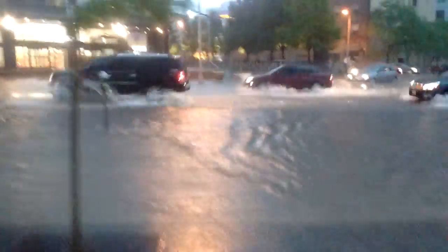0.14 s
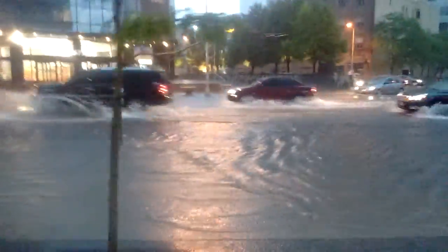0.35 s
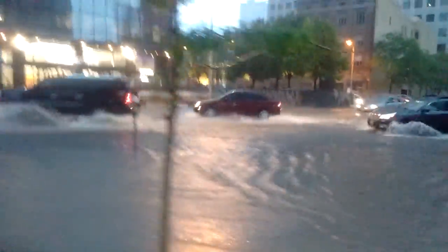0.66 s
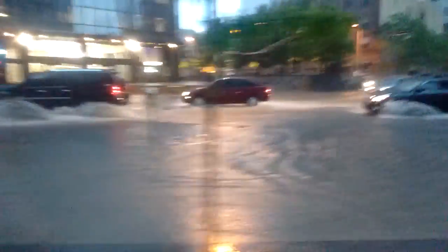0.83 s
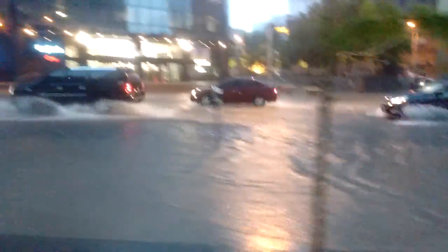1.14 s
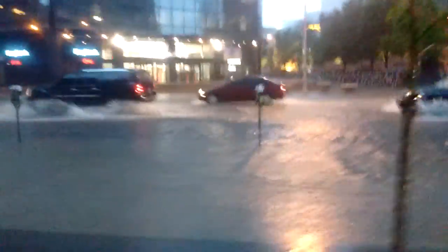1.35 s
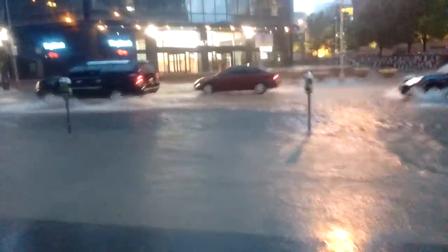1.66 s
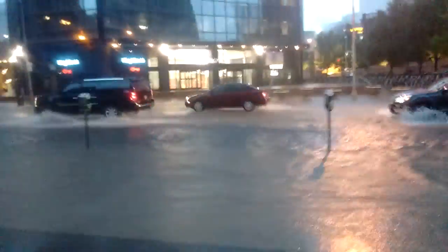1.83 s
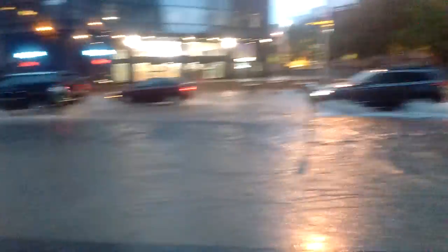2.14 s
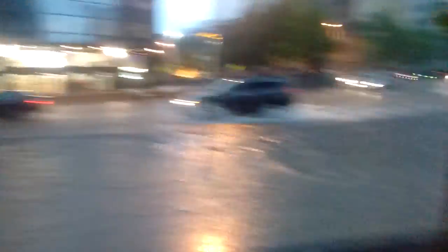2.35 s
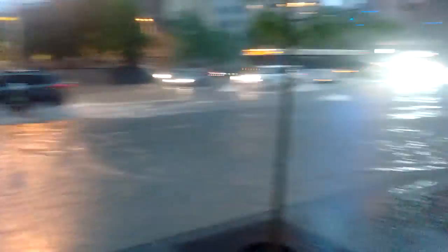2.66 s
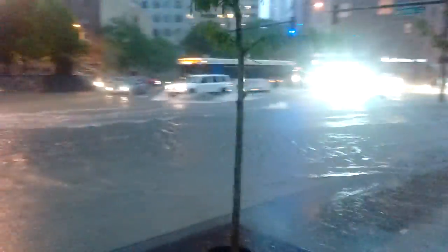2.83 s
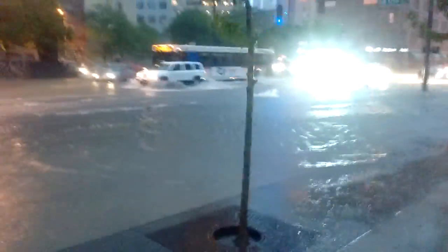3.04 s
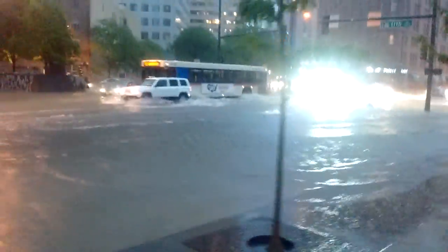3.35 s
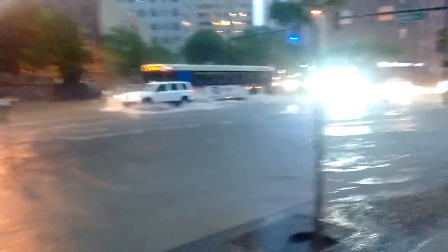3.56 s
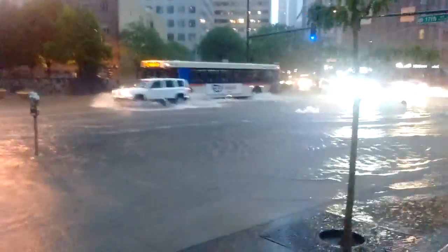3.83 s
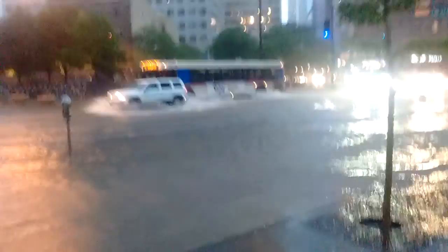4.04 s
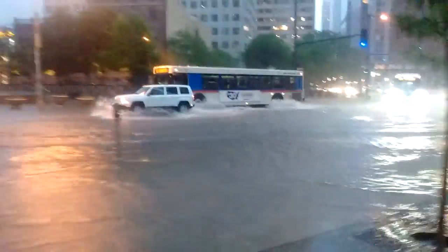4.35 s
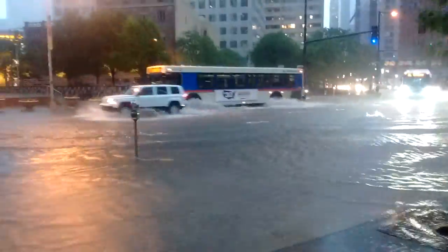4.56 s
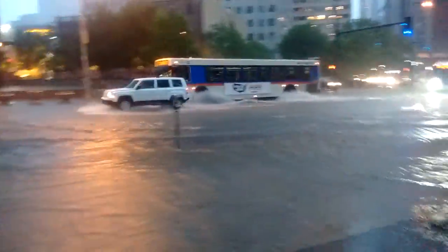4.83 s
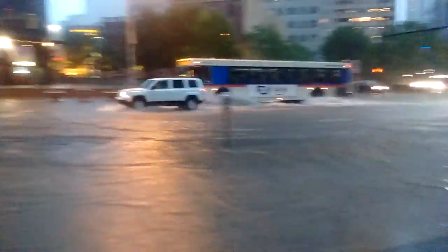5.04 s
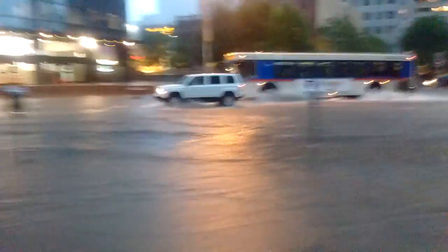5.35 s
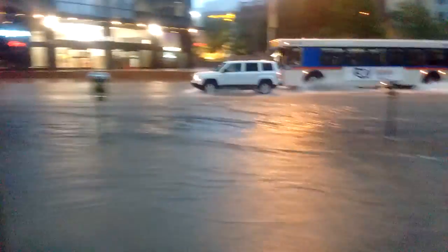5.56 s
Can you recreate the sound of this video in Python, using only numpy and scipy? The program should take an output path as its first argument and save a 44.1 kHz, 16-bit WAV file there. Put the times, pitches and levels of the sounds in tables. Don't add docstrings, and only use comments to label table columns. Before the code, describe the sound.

A dense, wide hiss of heavy rain and wheel spray fills about 5.7 seconds, steady and finely grained, with no pauses. Beneath it, cars and a bus pushing through a flooded street make lumpy bass rumble and deep exhaust throb. A low engine fades over the first three seconds; a mid engine revs around 0.9. At 0.72 a hard, bright drop strike on the casing overloads the right side and the whole street ducks sharply, climbing back over more than a second; faint ringing taps follow near 0.9. Bow waves swell around 2.3, a higher engine hum pushes at 2.1 and 2.9, and spray grows. A hollow knock at 2.96 causes another duck and ramp. A later engine slows from about 4 onward, strongest near 4.6, under a thin climbing hum. Hard knocks at 4.4 and 4.6 cut the level again; deep throb surges at 5.0, and a softer tick lands at 5.43.

```python
import sys
import numpy as np
from scipy import signal
from scipy.fft import rfft, irfft, next_fast_len
from scipy.io import wavfile

SR = 44100
rng = np.random.default_rng(int(sys.argv[2]) if len(sys.argv) > 2 else 0)


def int16_out(signal):
    q = np.round(np.clip(np.atleast_2d(signal).T, -1, 1) * 32767)
    wavfile.write(sys.argv[1], SR, q.astype(np.int16))


def rack_gain(trim_db):
    fader = np.asarray(trim_db, float)
    return 10 ** (fader / 20)


N = 250929
PORT_LAG_S = 14.2 / SR
SIZE = next_fast_len(N + 4096)
HZ = np.maximum(np.arange(SIZE // 2 + 1) * SR / SIZE, 1)


def at_hz(points):
    hz, db = np.transpose(points)
    return rack_gain(np.interp(np.log(HZ), np.log(hz), db))


def rms_one(x):
    return x / np.sqrt(np.mean(x ** 2) + 1e-20)


def drift(rate_hz):
    hop = 40
    r = np.exp(-2 * np.pi * rate_hz * hop / SR)
    white = rng.standard_normal(N // hop + 2002)
    slow = signal.lfilter([1], [1, -2 * r, r * r], white)[2000:]
    return np.interp(np.arange(N) / hop, np.arange(len(slow)), rms_one(slow))


def patchy(spectra, centres_hz, tilt_db, shared_db, own_db, rate_hz):
    out, together = 0, drift(rate_hz * 0.66)
    for k, tilt in enumerate(tilt_db):
        band = np.interp(np.log(HZ), np.log(centres_hz), np.arange(len(centres_hz)) == k)
        flicker_db = shared_db * together + own_db * drift(rate_hz)
        out = out + irfft(spectra * band, SIZE)[..., :N] * rack_gain(tilt + flicker_db)
    return rms_one(out)


def steer(ports):
    # (frequency [Hz], level [dB])
    into_left = [(550, -2), (1200, -0.5), (2500, -2.5), (3600, -7), (5000, -2), (6500, -4), (8000, -11),
                 (10000, -0.5), (11500, -13), (15300, -30)]
    into_right = [(550, 2.5), (1200, -4.5), (2500, -7.5), (3600, -7.5), (5000, -15), (6500, -10),
                  (8000, -10.5), (10000, -6.5), (11500, -40), (15300, -42)]
    left, right = ports
    late = np.exp(-2j * np.pi * HZ * PORT_LAG_S)
    return np.array([left - at_hz(into_left) * late * right, right - at_hz(into_right) * late * left])


def spray_lift_db():
    # (time [s], lift [dB])
    spray = [(0, 0.5), (.25, -1), (.75, -1), (1.4, -2), (1.8, 0), (2.05, -1), (2.4, 1), (2.75, 3.5),
             (2.95, 2), (3.3, 1.3), (3.6, 1), (4.1, 1.5), (4.8, 3), (5.1, 3), (5.57, 4), (5.69, 1.5)]
    return np.interp(np.arange(N) / SR, *np.transpose(spray))


def rain(spray_db):
    # (frequency [Hz], density [dB per Hz])
    left_port = [(300, -7.5), (550, -7), (800, 1), (1200, -0.5), (1800, -2.5), (2600, -4.5), (3600, -6),
                 (5000, -12.5), (6500, -18), (8000, -15.5), (9500, -19.5), (11500, -22.5), (13000, -25.5),
                 (15300, -28.5)]
    right_port = [(300, -5.5), (550, -5), (1000, -8), (1800, -.5), (2600, -7.5), (3600, -18.5),
                  (5000, -17.5), (6500, -25), (8000, -18), (9500, -20), (10500, -22), (11800, -56),
                  (13000, -71), (15300, -66)]
    splashes_per_s = 2500
    sizes = rack_gain(3.36 * np.minimum(rng.exponential(1, (2, SIZE)), 5))
    sizes = sizes * rng.choice([-1, 1], (2, SIZE))
    splashes = rms_one(sizes * (rng.random((2, SIZE)) < splashes_per_s / SR))
    white = 0.65 * splashes + rng.standard_normal((2, SIZE))
    ports = rfft(white) * [at_hz(left_port), at_hz(right_port)]
    centres_hz = np.geomspace(400, 14000, 11)
    tilts_db = [spray_db / (1 + (hz / 2500) ** 3) for hz in centres_hz]
    return patchy(steer(ports), centres_hz, tilts_db, shared_db=0.24, own_db=0.95, rate_hz=18.4)


def low_noise(spectrum, centres_hz, lumpy_db, rate_hz, pan_db):
    white = rfft(rng.standard_normal((2, SIZE))) * at_hz(spectrum)
    apart, alike = patchy(white, centres_hz, 0 * centres_hz, lumpy_db, lumpy_db, rate_hz)
    return apart * [[rack_gain(pan_db)], [-rack_gain(-pan_db)]] + rack_gain(-30.5 + 5.1 * drift(8)) * alike


def rumble():
    # (frequency [Hz], level [dB])
    rumble_spectrum = [(55, -14), (75, -1), (100, 1.5), (150, -1), (215, -3), (260, -4.5), (330, -8.5),
                       (400, -5.5), (480, -15), (620, -11), (800, -49), (1200, -89)]
    return low_noise(rumble_spectrum, np.geomspace(80, 700, 6), lumpy_db=1.6, rate_hz=7.6, pan_db=0.3)


def throb():
    # (frequency [Hz], level [dB])
    throb_spectrum = [(15, -36), (25, -18), (38, -5), (55, 28), (70, 11), (95, -60)]
    return low_noise(throb_spectrum, np.array([25., 55.]), lumpy_db=3.0, rate_hz=6.8, pan_db=1.1)


def surge_lifts_db():
    # (time [s], rumble lift [dB], throb lift [dB])
    surges = [(0, 6, 2), (.5, 2, 10), (1.15, 3, 1), (1.6, 2, 8), (2.02, 4, -2), (2.33, 8, 3), (2.7, 3, -1),
              (3.2, 4.5, 5), (3.5, 3.5, 4), (4.2, 1, 7), (4.4, 5, -8), (5.0, 3.5, 15), (5.2, 4, 4),
              (5.57, 2, 6)]
    t, half_width_s = np.arange(N) / SR, 0.13
    return sum(np.outer(lifts, np.exp(-((t - s) / half_width_s) ** 2)) for s, *lifts in surges)


def engines():
    # (time [s], firing rate [Hz], effort before gain [dB rms])
    engine_tables = [
        [(0, 40.3, -38), (.4, 38.7, -22), (1.2, 42.7, -26), (1.6, 50.7, -28), (1.9, 45.5, -37),
         (2.9, 41.7, -44)],
        [(.55, 90, -42), (.9, 96, -19), (1.15, 98.2, -37), (1.7, 112, -31), (2.05, 103, -30), (2.5, 79.6, -42)],
        [(3.75, 91, -42), (4.1, 88.7, -24), (4.6, 78.8, -15), (5.0, 77.8, -19), (5.69, 66, -32)],
        [(1.9, 145.4, -32), (2.1, 149, -17), (2.4, 152.5, -30), (2.9, 146.3, -16.5), (3.05, 151, -35)],
        [(3.2, 154.5, -35), (3.45, 159.6, -33), (3.8, 164.5, -23), (4.4, 161, -38), (4.65, 162, -22),
         (5.4, 176, -39)],
    ]
    t, out = np.arange(N) / SR, 0
    for rows in engine_tables:
        s, hz, db = np.transpose(rows)
        firing_hz = np.interp(t, s, hz) * (1 + 0.00852 * drift(4.8))
        phase = 2 * np.pi * np.cumsum(firing_hz) / SR
        effort_db = np.interp(t, s, db, left=-90, right=-90)
        level = rack_gain(effort_db + 2.5 * drift(5) + 3.5 * drift(14) - 5.5)
        out = out + np.sqrt(2) * level * (np.sin(phase) + rack_gain(-13) * np.sin(2 * phase + 1))
    return out * [[rack_gain(.5)], [-rack_gain(-.5)]]


def gain_db():
    # (time [s], cut [dB])
    cuts = [
        (0.7248, 14.5),
        (.9408, 0.2),
        (2.9617, 11),
        (4.3975, 10),
        (4.6005, 7.5),
        (5.4287, 1.5),
    ]
    start_db, hold_s, climb_db_per_s, attack_s = -5, 0.083, 11, 0.00029
    t, out = np.arange(N) / SR, np.zeros(N)
    level_db, since = start_db, 0

    def climbed(at):
        return np.minimum(level_db + climb_db_per_s * np.maximum(at - since, 0), 0)

    for s, cut_db in list(cuts) + [(N / SR + 1, 0)]:
        unset = (t < s) & (out == 0) & (t >= since - hold_s)
        out = np.where(unset, climbed(t), out)
        level_db, since = climbed(s) - cut_db, s + (hold_s if cut_db > 1 else 0)
    r = np.exp(-1 / (attack_s * SR))
    return signal.lfilter([1 - r], [1, -r], out, zi=[r * out[0]])[0]


def ring(clicks, hz, t60_s):
    r, w = rack_gain(-60 / (max(t60_s, 2e-4) * SR)), 2 * np.pi * hz / SR
    return signal.lfilter([0, np.sin(w)], [1, -2 * r * np.cos(w), r * r], clicks)


def drops():
    # (time [s], peak [dB], low casing mode [dB], port tick [dB], bright crack [dB])
    strikes = [
        (0.7239, -7, -24, 4.5, 0.5),
        (0.91, -37, 0, -1, 0),
        (.9153, -28.5, 11, 10, 8),
        (0.9392, -28.5, 14.5, -12, -10),
        (2.9603, -8.5, 7, 1, -2.5),
        (4.397, -7.5, -22, 4.5, -16),
        (4.6001, -5, 1, -2, -12),
        (5.4272, -13.5, -14, 0.5, -17),
    ]
    # (frequency [Hz], level [dB], t60 [s])
    bright_modes = [(5750, -18, 0.0022), (7900, -2, 0.0014), (10900, -2.5, 0.001), (14000, -21, 0.0007)]
    # (frequency [Hz], t60 [s])
    port_mode = (4010, 0.0033)
    casing_low, casing_high = (2050, 0.0055), (2800, 0.0035)   # (frequency [Hz], t60 [s])
    out, gain = np.zeros(SIZE), gain_db()
    blow = np.zeros(900)
    blow[:2] = .5
    push = np.convolve(blow, np.hanning(7) / 3)[:900]
    for s, peak_db, low_db, tick_db, crack_db in strikes:
        i = round(s * SR)
        knock = ring(push, *casing_high) + rack_gain(low_db) * ring(push, *casing_low)
        knock += rack_gain(tick_db) * ring(push, *port_mode)
        knock += sum(rack_gain(crack_db + db) * ring(blow, hz, t60_s) for hz, db, t60_s in bright_modes)
        out[i:i + 900] += rack_gain(peak_db + 6.0 - gain[i]) * knock
    out = signal.sosfilt(signal.butter(6, 14500, fs=SR, output="sos"), out)
    late = irfft(rfft(out) * np.exp(-2j * np.pi * HZ * PORT_LAG_S), SIZE)
    dull = signal.lfilter(*signal.butter(3, 9500, fs=SR), late)
    return np.array([-.9 * dull, out])[:, :N]


def scene():
    t = np.arange(N) / SR
    spray_db = spray_lift_db()
    rumble_lift_db, throb_lift_db = surge_lifts_db()
    rain_db = -21 - 0.24 * spray_db
    throb_db = -34.5 - 1.9 * t + throb_lift_db
    street = rack_gain(rain_db) * rain(spray_db)
    street += rack_gain(-21 + rumble_lift_db) * rumble()
    street += rack_gain(throb_db) * throb()
    street += engines()
    top_hz = 15400
    top_edge = signal.cheby2(12, 60, top_hz * 1.066, fs=SR, output="sos")
    return signal.sosfilt(top_edge, street) + drops()


def roll_off(x):
    return signal.sosfilt(signal.butter(12, 16500, fs=SR, output="sos"), x)


def record(dry):
    bass_hz, bass_attack_s = 300, 0.005
    bass = signal.sosfilt(signal.butter(1, bass_hz, fs=SR, output="sos"), dry)
    r, gain = np.exp(-1 / (bass_attack_s * SR)), gain_db()
    lagging = signal.lfilter([1 - r], [1, -r], gain, zi=[r * gain[0]])[0]
    held = (dry - bass) * rack_gain(gain) + bass * rack_gain(lagging)
    return roll_off(np.clip(held, -1, 1))


dry = scene()
out = record(dry)
int16_out(out)
```